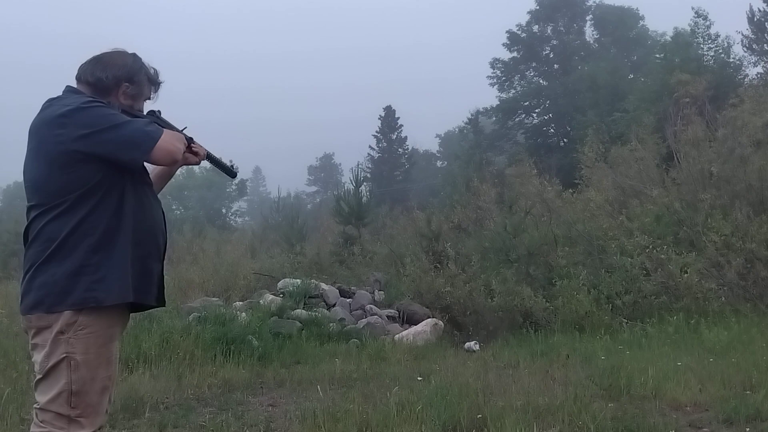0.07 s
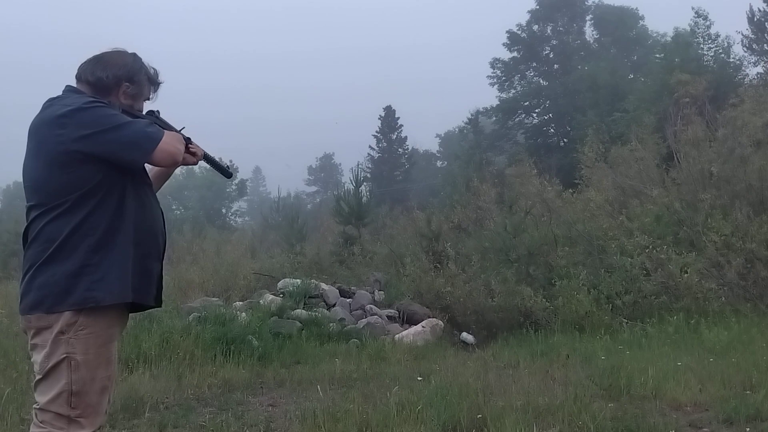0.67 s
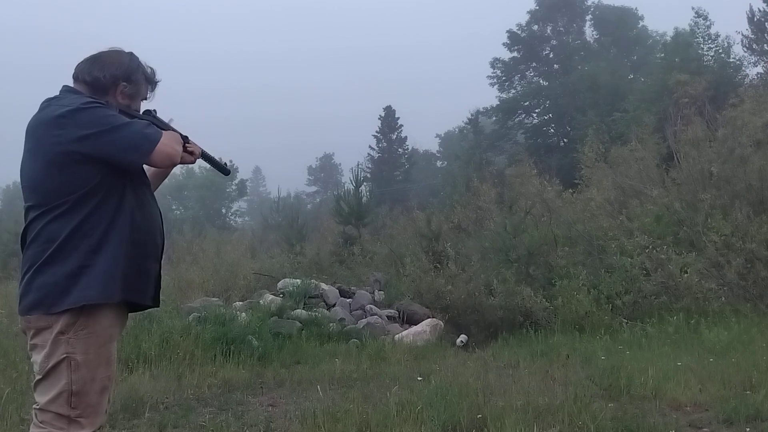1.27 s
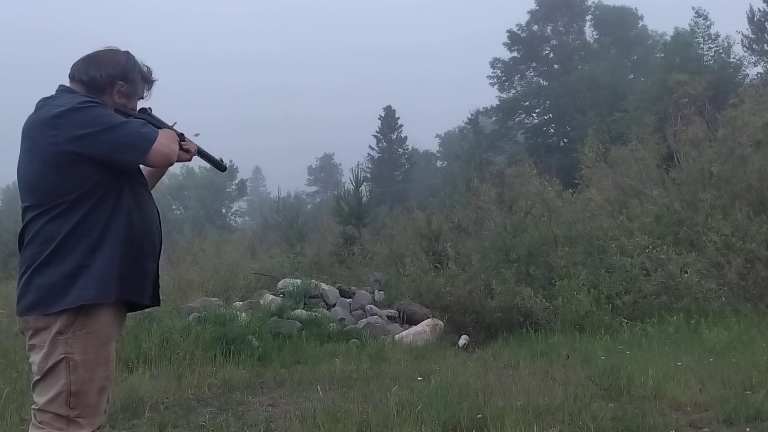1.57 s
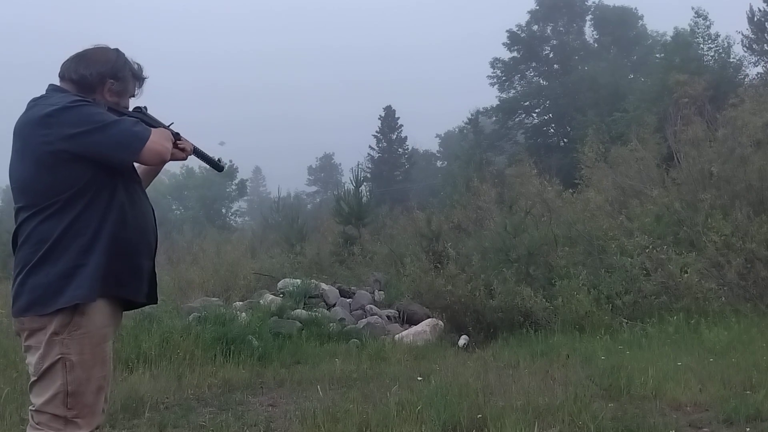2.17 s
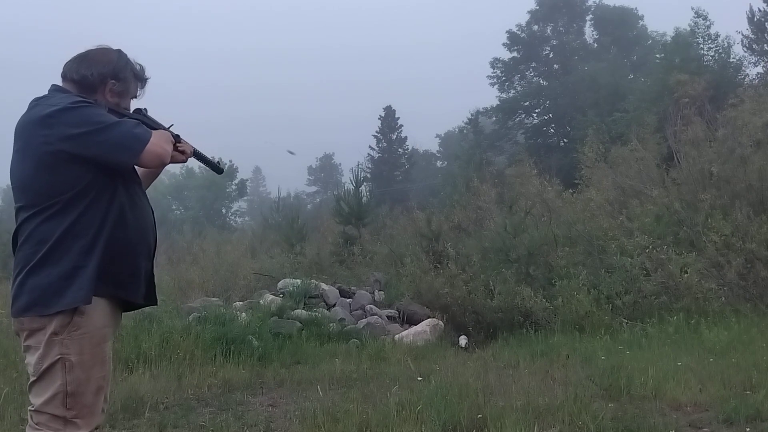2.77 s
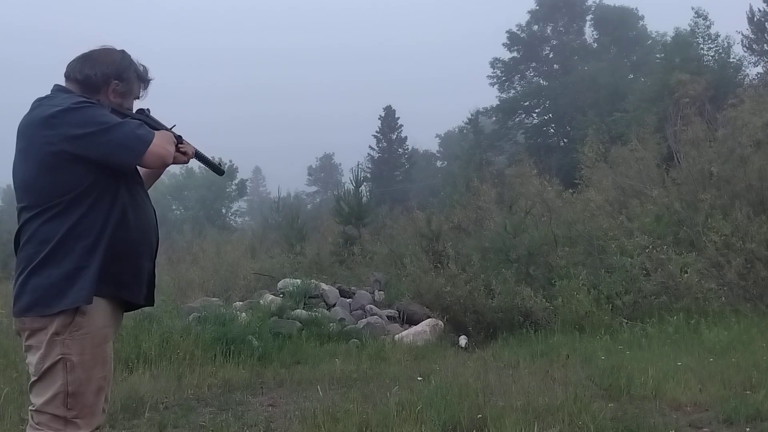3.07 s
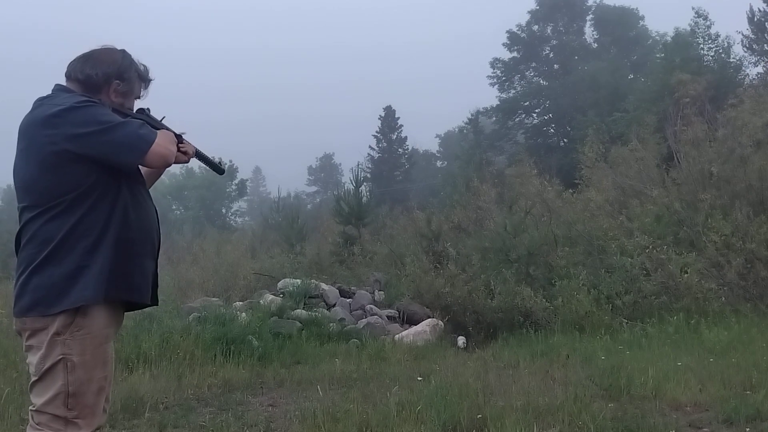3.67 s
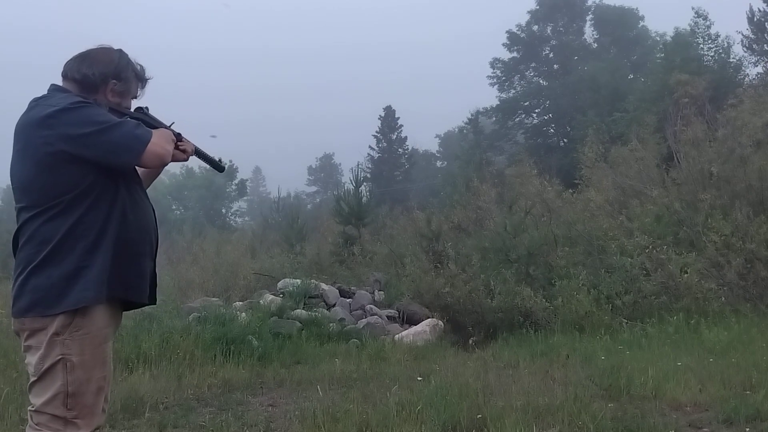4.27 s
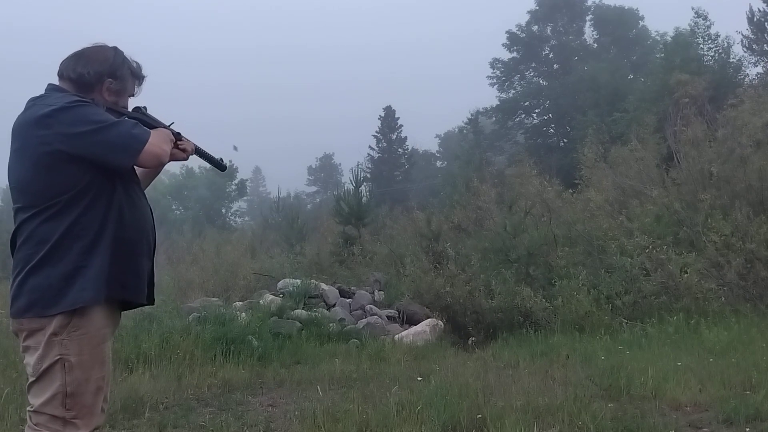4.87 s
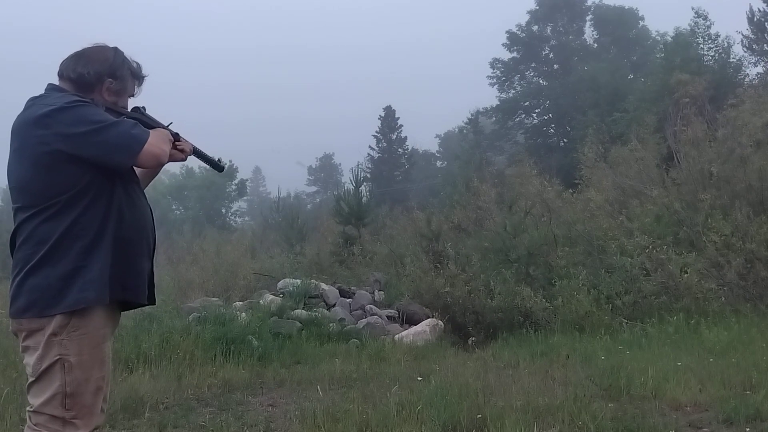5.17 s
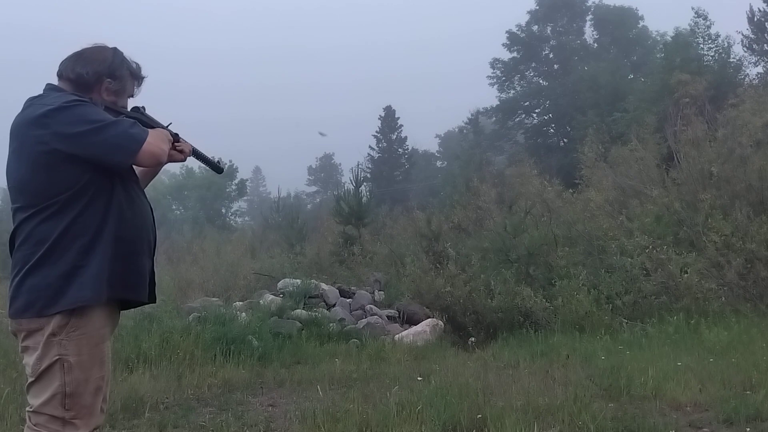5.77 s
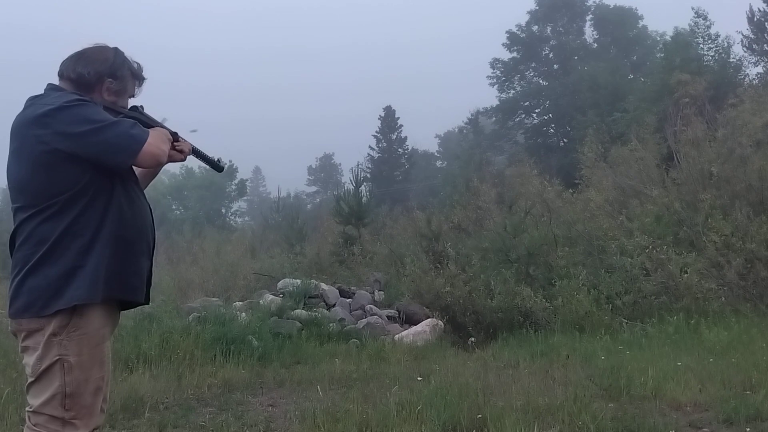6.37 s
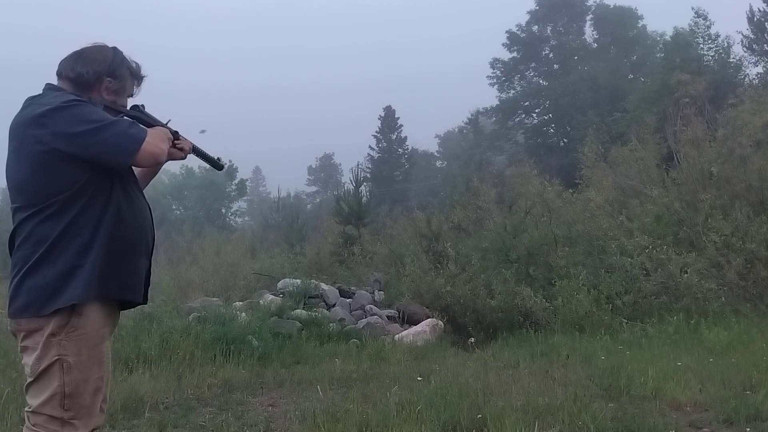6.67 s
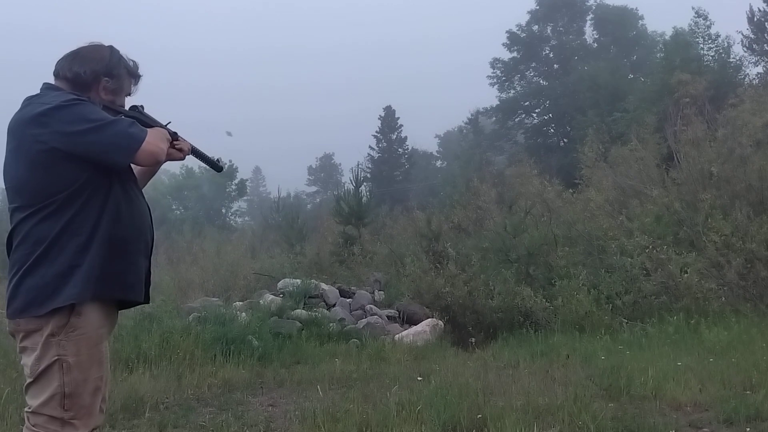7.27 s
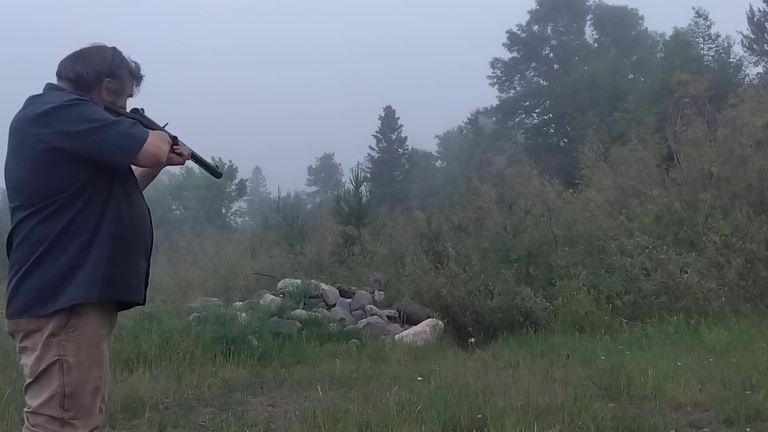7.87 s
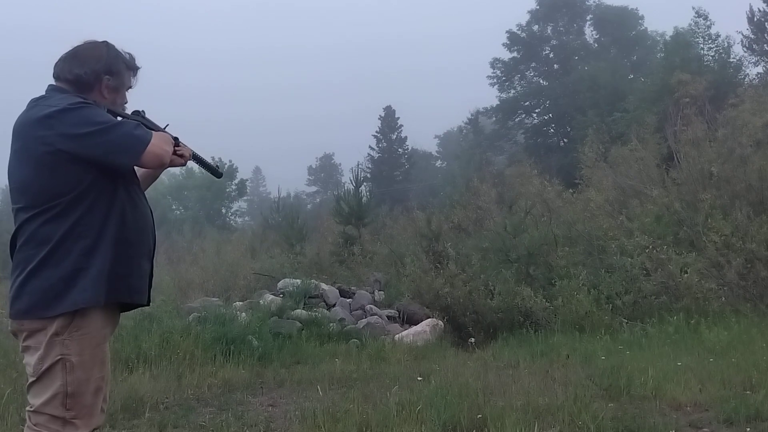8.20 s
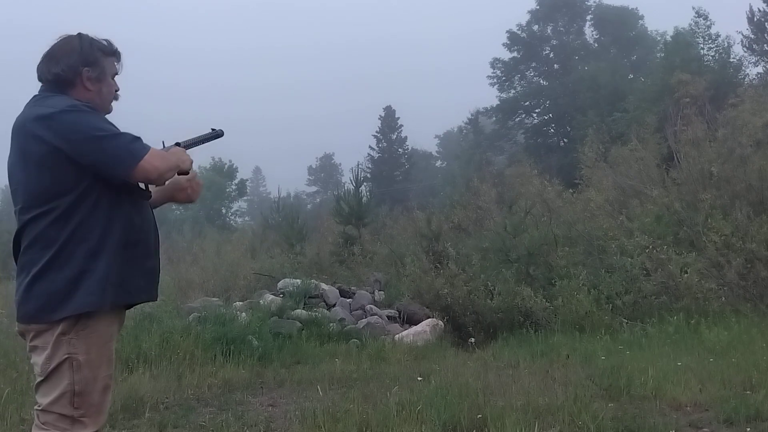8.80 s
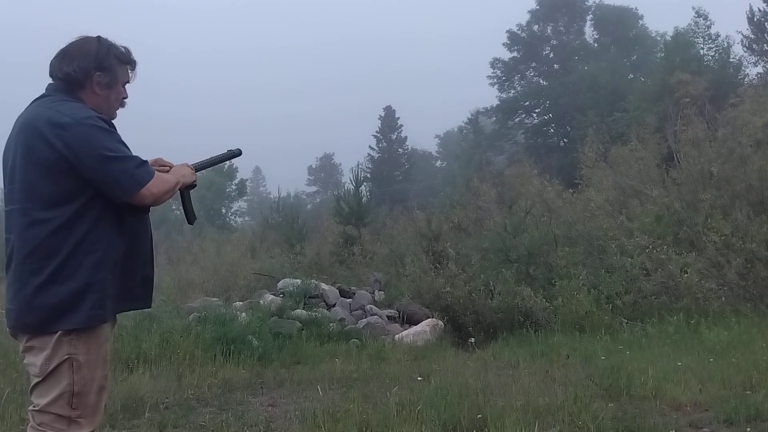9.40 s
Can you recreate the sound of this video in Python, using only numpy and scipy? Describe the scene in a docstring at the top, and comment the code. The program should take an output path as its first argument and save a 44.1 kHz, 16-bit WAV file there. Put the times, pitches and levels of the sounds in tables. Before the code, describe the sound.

A carbine fires a long string of rapid, even shots outdoors, echoes fading from the trees before a few faint handling clicks.

```python
"""A semi-automatic carbine fires a fast string of shots in a meadow, a few metres from a small camera.
Each muzzle blast saturates the microphone amplifier and blocks it for about 40 ms; it reopens on
the roar scattered by the brush. Echoes roll back from the tree line, losing treble to air absorption.
Then, over faint outdoor air, the gun is lowered: steel parts click, hands bump and sleeves rustle."""
import sys
import numpy as np
from scipy import signal
from scipy.fft import rfft, irfft, next_fast_len
from scipy.io import wavfile
from scipy.ndimage import uniform_filter1d

SR = 44100
rng = np.random.default_rng(int(sys.argv[2]) if len(sys.argv) > 2 else 0)


def persist_wave(psi):
    """Save psi, clipped to +-1, as 16-bit WAV."""
    counts = np.round(np.clip(psi, -1, 1) * 32767).astype(np.int16)
    wavfile.write(sys.argv[1], SR, np.atleast_2d(counts).T)


N = 420713
LEAD = SR // 10  # samples before time zero, when the firing is already under way


def from_db(db):
    """Amplitude ratio of a level in decibels."""
    return 10 ** (np.asarray(db) / 20)


def unit_rms(x):
    """Normalisation to rms 1."""
    return x / np.sqrt(np.mean(x ** 2) + 1e-20)


def add(mix, start_s, sound):
    """Superposition: adds a sound at start_s, dropping whatever lies outside the mix."""
    at = round(start_s * SR)
    sound = sound[max(-at, 0):]
    part = mix[max(at, 0):][:len(sound)]
    part += sound[:len(part)]


def noise(colour, size):
    """Spectral shaping: noise of rms 1 that follows (frequency_hz, relative_db) points."""
    hz, db = np.transpose(colour)
    length = next_fast_len(size)
    gain = from_db(np.interp(np.log(np.fft.rfftfreq(length, 1 / SR) + 1), np.log(hz), db))
    return unit_rms(irfft(rfft(rng.standard_normal(length)) * gain, length)[:size])


def flutter(size, span):
    """Random fluctuation of rms 1, a moving average over span points."""
    return unit_rms(uniform_filter1d(rng.standard_normal(size), size=span))


def one_pole(x, hz, kind):
    """First-order "low" or "high" pass."""
    return signal.lfilter(*signal.butter(1, hz, kind, fs=SR), x)


def overload(blocked_s, t=0):
    """Exponential discharge: a blast's offset leaks down to the amplifier's full swing after blocked_s."""
    return np.exp((blocked_s - t) / .0124)


# Shots, each with the time it blocks the amplifier, the gain of its roar and echo, and its punch:
# start_s, blocked_s, strength_db, punch_db
SHOTS = [(-0.031, 0.038, -2, -3.5), (0.2445, 0.039, 0, 2), (0.52, 0.025, 1.5, 6.5),
         (0.7949, 0.041, -7, 0.5), (1.0805, 0.04, -.5, 1), (1.355, 0.042, 0.5, -1.5), (1.609, 0.04, 2, 1.5),
         (1.8811, .044, 1.5, -4.5), (2.1447, 0.041, 0.5, 0), (2.4152, 0.033, 1, 6.5),
         (2.6765, .051, 0, 1.5), (2.9391, 0.049, 0, -2), (3.2065, 0.046, 0, 1), (3.4752, 0.038, 1.5, 2.5),
         (3.7452, 0.05, 0.5, -4.5), (4.0131, 0.048, 0.5, 1), (4.2806, .042, 1, -2.5),
         (4.5491, 0.051, 0, -5.5), (4.8174, 0.044, 0, 1.5), (5.0771, 0.037, 2.5, 2), (5.346, .045, 0.5, -2),
         (5.6237, 0.035, 2, -0.5), (5.8855, 0.048, 1.5, 0), (6.1572, 0.038, .5, 5.5),
         (6.4203, .04, 0.5, -1.5), (6.6906, 0.047, 0.5, -2.5), (6.9709, 0.047, 0, -1.5),
         (7.2429, .044, 0, -1.5), (7.5052, 0.046, 1, -6)]

def blasts(shrill_hz=5000, bark_hz=500, crack_fade_s=.0008, bark_fade_s=.0014):
    """Impulsive radiation: a shrill crack over a lower bark that grows and lengthens with the punch."""
    out, t = np.zeros(N), np.arange(SR // 100) / SR
    for start_s, blocked_s, _, punch_db in SHOTS:
        shrill, low = rng.standard_normal((2, len(t)))
        crack = unit_rms(one_pole(shrill, shrill_hz, "high")) * np.exp(-t / crack_fade_s)
        bark = unit_rms(signal.lfilter(*signal.iirpeak(bark_hz, 1, fs=SR), low))
        bark *= from_db(-4 + 1.1 * punch_db) * np.exp(-t / bark_fade_s / np.exp(.058 * punch_db))
        add(out, start_s, overload(blocked_s) * from_db(-1) * (crack + bark))
    return out


def scatter(t, peak_s, level_db, rise_db_per_s, fall_db_per_doubling):
    """Scattering envelope: exponential growth up to the delay peak_s, then power-law decay."""
    rise_db = rise_db_per_s * np.maximum(peak_s - t, 0)
    fall_db = fall_db_per_doubling * np.log2(np.maximum(t / peak_s, 1))
    return from_db(level_db - rise_db - fall_db)


# Spectrum of the roar from grass and brush: frequency_hz, relative_db
BRUSH_COLOUR = [(40, -5), (150, -0.5), (280, 0.5), (400, 3.5), (550, 2), (750, 0.5), (1200, -3.5),
                (2400, 2), (5000, -1), (8000, -1.5), (12000, 0), (16000, -7.5)]

def brush(shared=.27, thicket_delay_s=.051, grain_db=3.5, body_hz=1200, body_fade_db_per_s=70):
    """Diffuse scattering: countless reflections off nearby growth form a roar whose low body dies first."""
    out, t = np.zeros(N), np.arange(0, .2, 1 / SR)
    envelope = scatter(t, thicket_delay_s, level_db=-8, rise_db_per_s=226, fall_db_per_doubling=26)
    body_loss_db = body_fade_db_per_s * np.maximum(t - thicket_delay_s, 0)
    common = noise(BRUSH_COLOUR, len(t))  # the part that is alike from shot to shot
    for start_s, _, strength_db, punch_db in SHOTS:
        roar = np.sqrt(shared) * common + np.sqrt(1 - shared) * noise(BRUSH_COLOUR, len(t))
        roar = unit_rms(roar * from_db(grain_db * flutter(len(t), 30)))
        body_gain = from_db(3 + .3 * punch_db - body_loss_db)
        roar += (body_gain - 1) * one_pole(roar, body_hz, "low")
        add(out, start_s, from_db(strength_db) * envelope * roar)
    return out


# Spectrum of the echo from the woods: frequency_hz, relative_db
TREES_COLOUR = [(40, -7.5), (180, -8), (300, -7), (550, -3.5), (800, -1), (1200, -2), (1750, 2.5),
                (2400, 3.5), (3200, -2), (4500, 0), (6000, -1.5), (10000, -2), (16000, -6.5)]
# Dense stands of trees, which reflect more strongly: delay_s, spread_s, extra_db
STANDS = [(0.174, .018, 3.5), (.258, .024, 7.5), (0.361, .02, 2.5), (.48, .04, 3)]

def tree_response(absorption_db_per_s=46, patchy_db=2.5, slap_db=1.25):
    """Backscatter with air absorption: one echo, lumpy with the slaps of single trees, dulls with delay."""
    delay = np.arange(0, 2.1, 1 / SR)
    stands_db = sum(db * np.exp(-((delay - delay_s) / spread_s) ** 2) for delay_s, spread_s, db in STANDS)
    envelope = scatter(delay, .072, level_db=-26 + stands_db, rise_db_per_s=480, fall_db_per_doubling=9)
    hz, t, spectrum = signal.stft(noise(TREES_COLOUR, len(delay)), SR, nperseg=256)
    patches = uniform_filter1d(rng.standard_normal(spectrum.shape), size=8, axis=0)  # across frequency
    patches = unit_rms(uniform_filter1d(patches, size=6, axis=1))  # across time
    slaps = flutter(len(t), 3)
    loss_db = absorption_db_per_s * (hz[:, None] / 10000) ** .83 * t  # the rate holds at 10 kHz
    spectrum *= from_db(patchy_db * patches + slap_db * slaps - loss_db)
    return envelope * signal.istft(spectrum, SR, nperseg=256)[1][:len(delay)]


def trees(shared=.18):
    """Partial coherence: the tree line answers every shot, and moving air changes each answer."""
    out, common = np.zeros(N), tree_response()
    for start_s, _, strength_db, _ in SHOTS:
        echo = np.sqrt(shared) * common + np.sqrt(1 - shared) * tree_response()
        add(out, start_s, from_db(strength_db) * echo)
    return out


# Spectrum of the background: frequency_hz, relative_db
AIR = [(10, 15), (25, 2.5), (60, -5), (120, -25.5), (230, -24.5), (400, -32), (700, -26), (2000, -40.5),
       (5000, -40.5), (10000, -44), (16000, -55.5)]

def air(level_db=-58.5):
    """Stationary noise floor: still outdoor air and microphone hiss."""
    return from_db(level_db) * noise(AIR, N)


# Metal clicks of the gun being handled: start_s, level_db, t60_s
CLICKS = [(8.1238, -39.5, 0.012), (8.127, -59, 0.14), (8.143, -60, 0.027), (8.7498, -59, .05),
          (8.855, -65, 0.03), (9.5322, -45, 0.012), (9.5355, -48, .012)]
# Spectrum of a sharp click: frequency_hz, relative_db
CLICK_COLOUR = [(200, -16), (1000, -3), (2200, -4), (4200, 1), (7000, -4.5), (11000, 3), (16000, 6)]

def clicks(dull_hz=4000, sharp_db=-50):
    """Impact noise: steel parts meet in dry, decaying clicks, duller when softer than sharp_db."""
    out, t = np.zeros(N), np.arange(SR // 5) / SR
    for start_s, level_db, t60_s in CLICKS:
        bright = noise(CLICK_COLOUR, len(t))
        sharpness = min(from_db(level_db - sharp_db), 1)
        click = sharpness * bright + (1 - sharpness) * one_pole(bright, dull_hz, "low")
        add(out, start_s, from_db(level_db - 60 * t / t60_s) * click)
    return out


# Soft, low bumps: start_s, level_db, pitch_hz
BUMPS = [(8.279, -52, 24), (8.335, -41.5, 15), (8.527, -39.5, 23), (8.672, -48, 12.4), (9.255, -49.5, 6.8),
         (9.495, -49, 18)]

def bumps(decay_per_cycle=3.55):
    """Heavily damped oscillation: as the shooter shifts and lowers the gun, bumps die within a cycle."""
    out, t = np.zeros(N), np.arange(SR // 5) / SR
    for start_s, level_db, pitch_hz in BUMPS:
        swing = -2 * np.sin(2 * np.pi * pitch_hz * t) * np.exp(-decay_per_cycle * pitch_hz * t)
        add(out, start_s, from_db(level_db) * swing)
    return out


def rustle(middle_s=8.7, spread_s=.17, level_db=-78.5, cutoff_hz=5000, grain_db=2.5):
    """Friction noise: sleeves and hands slide in one soft, grainy swell as the gun comes down."""
    swell = np.exp(-((np.arange(N) / SR - middle_s) / spread_s) ** 2)
    grains = from_db(grain_db * flutter(N, 400))
    hiss = one_pole(rng.standard_normal(N), cutoff_hz, "low")
    return from_db(level_db) * swell * unit_rms(grains * hiss)


def scene():
    """Linear superposition: sound pressure at the camera, in units of the amplifier's full swing."""
    return (air() + blasts() + brush() + trees() + clicks() + bumps() + rustle())[None]


def microphone(x, port_hz=10200, width_hz=1800, port_db=13.5):
    """Acoustic resonance: the small sound port rings in the high treble."""
    ring = signal.lfilter(*signal.iirpeak(port_hz, port_hz / width_hz, fs=SR), x)
    return x + (from_db(port_db) - 1) * ring


def kicks(length, width_s=.00004, roughness=.7, fade_s=.0013, usual_block_s=.045):
    """Specular reflection: sharp returns of each blast knock the blocked amplifier off its rail."""
    out, t = np.zeros(length), np.arange(SR // 200) / SR
    pulse = np.exp(-(t / width_s - 1) ** 2)
    for start_s, blocked_s, _, punch_db in SHOTS:
        # a block shorter than usual is shaken harder, a longer one hardly at all
        slack_s = usual_block_s - blocked_s
        loose_db = slack_s * (899.5 if slack_s > 0 else 3999.5)
        ground, near, bush = (.0032, -2.1 + 1.4 * punch_db), (.0139, -2 + loose_db), (.025, -24.5 + loose_db)
        for delay_s, depth_db in (ground, near, bush):
            wake = np.maximum(microphone(rng.standard_normal(len(t))) - 1, 0) * np.exp(-t / fade_s)
            add(out, start_s + delay_s + LEAD / SR, from_db(depth_db) * (pulse + roughness * wake))
    return out


def amplifier(x, charge_s=.0011, kick_limit=.91):
    """Blocking distortion: each blast charges an offset that pins the signal to the rail until it leaks."""
    offset, t = np.zeros(len(x)), np.arange(SR // 4) / SR
    for start_s, blocked_s, *_ in SHOTS:
        add(offset, start_s + LEAD / SR, overload(blocked_s, t) * (1 - np.exp(-t / charge_s)))
    knocks = kick_limit * np.tanh(kicks(len(x)) / kick_limit)
    pinned = np.maximum(np.tanh(x + offset) - knocks, -1)
    # two coupling capacitors turn each pinned stretch into a slow swing
    return one_pole(one_pole(pinned, .48, "high"), 2.37, "high")


def gain_control(x, gain_db=10.9, threshold_db=-24.4, slope=.74, recovery_db_per_s=68, attack_hz=13.4):
    """Dynamic compression: the gain drops within some 12 ms of a peak and recovers steadily."""
    level_db = 10 * np.log10(abs(uniform_filter1d(x ** 2, size=40)) + 1e-12)
    over_db = np.maximum(level_db - threshold_db, 0)
    recovery_db = recovery_db_per_s * np.arange(len(x)) / SR
    held_db = np.maximum.accumulate(over_db + recovery_db) - recovery_db
    return x * from_db(gain_db - slope * one_pole(held_db, attack_hz, "low"))


def record(dry, low_rail=.58, edge_hz=16000):
    """Nonlinear transduction: port, blocking amplifier, gain control, asymmetric clipping, band limit."""
    picked_up = microphone(np.pad(dry[0], (LEAD, 0)))
    compressed = gain_control(amplifier(picked_up))
    clipped = np.clip(compressed, -low_rail, np.sqrt(.5))
    band_limit = signal.firwin(201, edge_hz, window=("kaiser", 9), fs=SR)
    return signal.oaconvolve(clipped, band_limit, "same")[None, LEAD:]


dry = scene()
out = record(dry)
persist_wave(out)
```